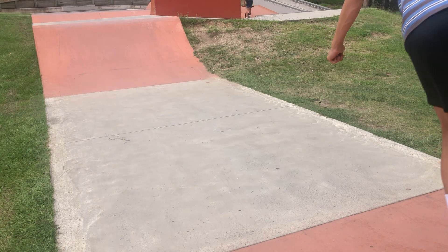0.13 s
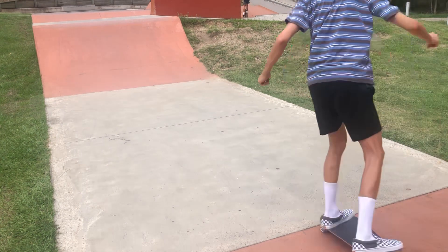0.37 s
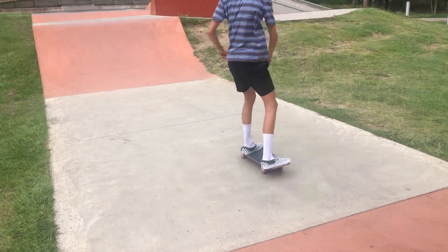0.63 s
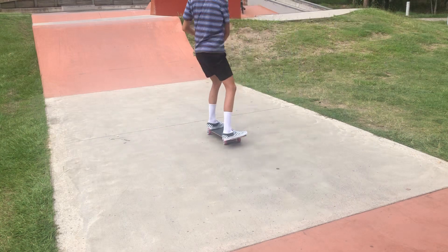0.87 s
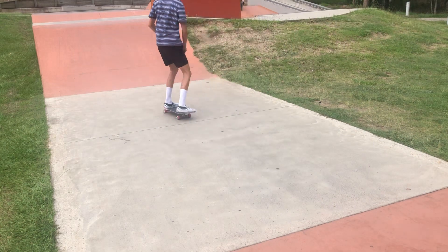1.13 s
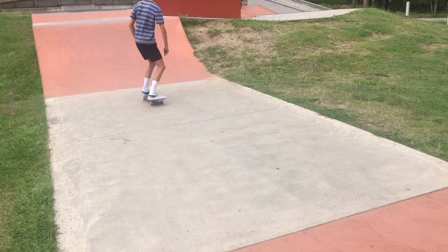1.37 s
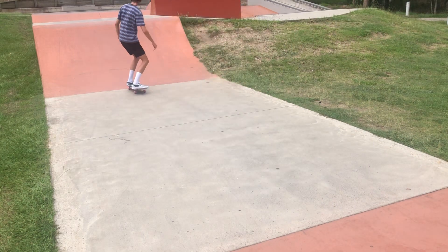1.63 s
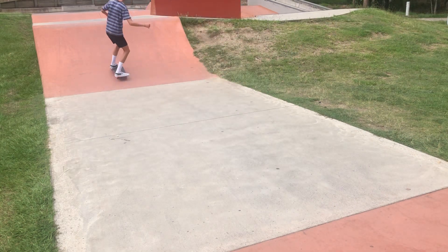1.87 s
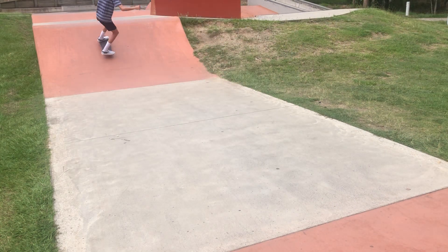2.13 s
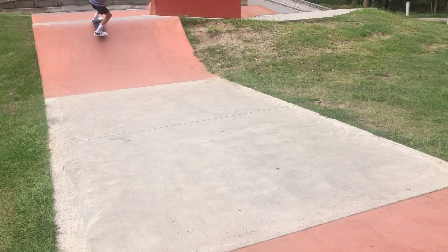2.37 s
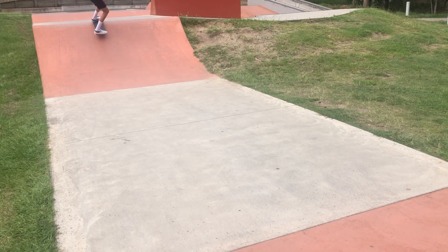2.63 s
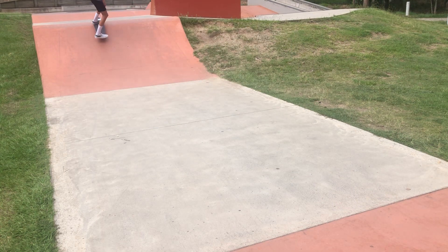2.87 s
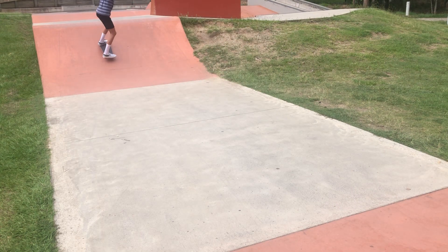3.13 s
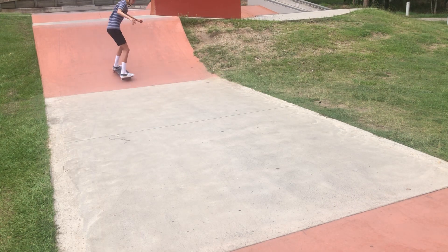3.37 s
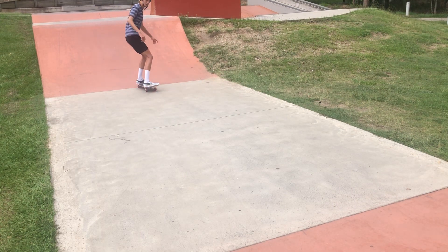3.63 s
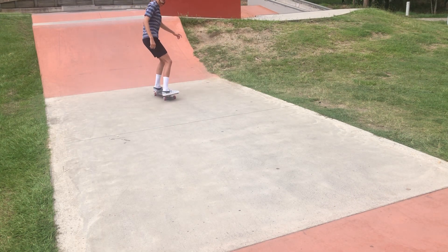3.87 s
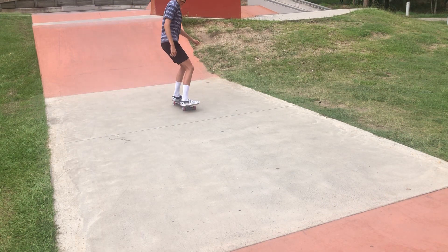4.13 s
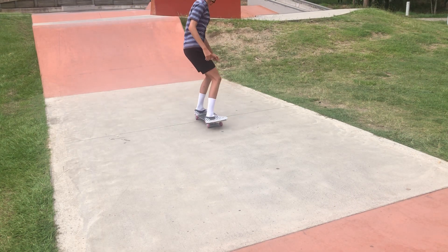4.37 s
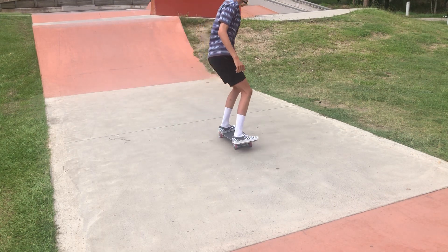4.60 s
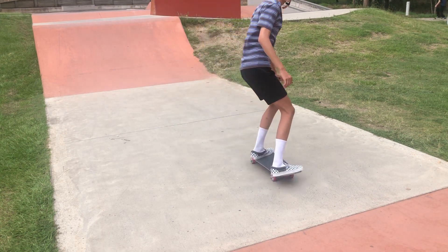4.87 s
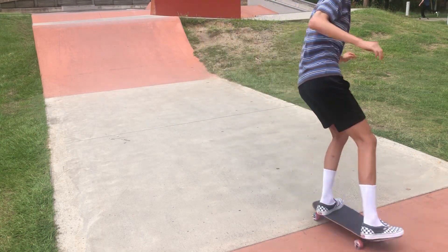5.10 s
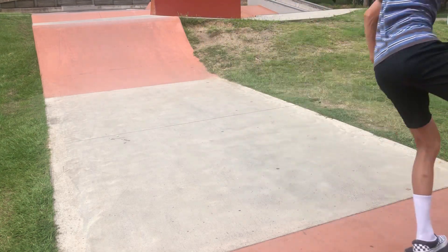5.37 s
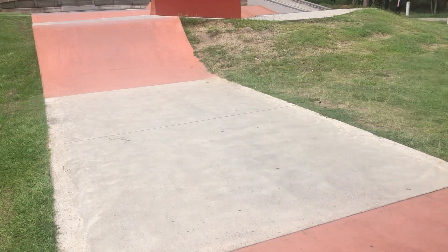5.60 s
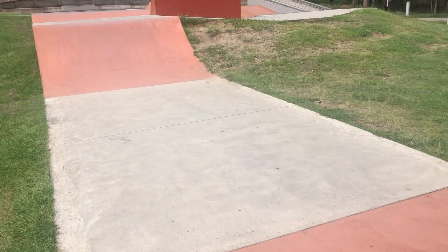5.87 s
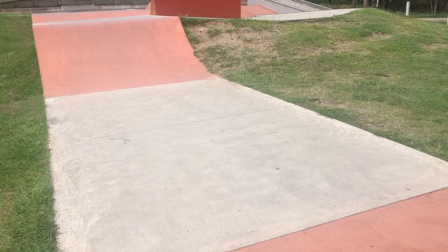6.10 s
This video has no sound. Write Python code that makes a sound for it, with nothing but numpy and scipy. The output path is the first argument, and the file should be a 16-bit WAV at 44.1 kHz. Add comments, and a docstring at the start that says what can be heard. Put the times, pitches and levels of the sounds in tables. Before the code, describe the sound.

Sharp board clack, gritty wheel roar fading into the distance, faint turn, roar swelling back, two hard clacks, then scraping shoe steps outdoors.

```python
"""A skateboard slams down beside a phone, rolls away over concrete, turns on a far ramp and rolls back; the rider steps off.
Random grains under the wheels excite resonances of the wooden deck and its axles, with hiss and fine grit on top.
Slab joints strike single blows, wheels judder and skid in the turn, a loose bearing ticks, and shoes scuff over grains.
Behind it lie filtered noise for traffic and cicadas, low wavering hums for two far engines and gliding whistles for a bird."""
import sys
import numpy as np
from scipy import signal
from scipy.fft import rfft, irfft, next_fast_len
from scipy.io import wavfile
from scipy.ndimage import uniform_filter1d

SR = 44100
rng = np.random.default_rng(int(sys.argv[2]) if len(sys.argv) > 2 else 0)


def decibels_to_gain(level_db):
    """Convert a level in decibels to a linear amplitude gain (20 dB per decade)."""
    exponent = np.asarray(level_db, float) / 20
    return 10 ** exponent


def bounce(signal):
    """Save signal as a 16-bit WAV file at the path given by the first command-line argument."""
    frames = np.transpose(np.atleast_2d(signal))
    limited = np.clip(frames, -1, 1)
    pcm = np.round(limited * 32767).astype(np.int16)
    wavfile.write(sys.argv[1], SR, pcm)


N = 275095
T = np.arange(N) / SR

# Resonances of the loaded deck: its slow flex, its roar, and the ring of the axles.
# Each row: centre in Hz, distance from the centre to the -6 dB points in Hz, gain in dB.
FLEX = [(146.5, 21, -9), (268, 102, -1), (350.6, 42.4, 4.5), (476.7, 106, 6.5)]
ROAR = [(584, 264, -3), (787, 169, 1.63), (982.5, 136, -3)]
AXLES = [(1127, 125, 5.5), (1426, 311, 2), (1773, 316, 1.5), (1904, 260, 0)]


def unit(x):
    """Scale to rms 1."""
    return x / np.sqrt(np.mean(x ** 2))


def colour(x, points):
    """Causal minimum-phase filter whose gain follows (Hz, dB) points, joined over log frequency."""
    hz, db = np.transpose(points)
    log_hz = np.log(np.maximum(np.fft.rfftfreq(4096, 1 / SR), 1))
    cepstrum = irfft(np.log(decibels_to_gain(np.interp(log_hz, np.log(hz), db))))
    # folding the cepstrum forward in time makes the filter causal
    cepstrum[1:2048] *= 2
    cepstrum[2049:] = 0
    impulse = irfft(np.exp(rfft(cepstrum)))
    return signal.oaconvolve(x, impulse)[:len(x)]


def ring(x, modes):
    """Sum of resonances with alternating sign, each applied twice."""
    out = 0
    for k, (hz, width, db) in enumerate(modes):
        b, a = signal.iirpeak(hz, hz / width / 2, SR)
        once = signal.lfilter(b, a, x)
        out = out + (-1) ** k * decibels_to_gain(db) * signal.lfilter(b, a, once)
    return out


def walk(rate):
    """Random levels held 1 / rate s and slewed twice."""
    k = int(SR / rate)
    held = np.repeat(rng.standard_normal(N // k + 1), k)
    return 1.02 * uniform_filter1d(uniform_filter1d(held, k), k)[:N]


def grit(count, per_s, scatter_db):
    """Grains of concrete: random clicks, a few much larger than the rest."""
    when = rng.random(count)
    sign = rng.standard_normal(count)
    size = rng.exponential(size=count)
    return (when < per_s / SR) * sign * decibels_to_gain(scatter_db * size)


def add(out, s, x):
    """Mix x into out from time s."""
    i = int(s * SR)
    out[i:i + len(x)] += x[:N - i]


def curves(table):
    """Columns of a table joined by straight lines in time."""
    s, *columns = np.transpose(table)
    return [np.interp(T, s, c) for c in columns]


def traffic():
    """Far road noise; bass and middle swell on their own."""
    # Spectrum of the far road. Each row: frequency in Hz, relative density in dB per Hz.
    road_tone = [(15, -30), (25, -14.5), (104, 5.5), (172, 2.5), (211, -1.5), (1480, -5), (1620, -6),
                 (1910, -23), (2040, -13), (2750, -22), (3620, -21), (6000, -32), (7800, -113),
                 (13200, -120)]
    hum = unit(colour(rng.standard_normal(N), road_tone))
    bass = signal.sosfilt(signal.butter(2, 130, fs=SR, output="sos"), hum)
    bass_swell, middle_swell = decibels_to_gain(2.5 * walk(2)), decibels_to_gain(1.5 * walk(5))
    return decibels_to_gain(-50) * (bass * bass_swell + (hum - bass) * middle_swell)


def engine(table):
    """A low hum is all that carries this far; pitch and level waver at random, silent outside its span."""
    s, hz, db = np.transpose(table)
    wavering_hz = np.interp(T, s, hz) * (1 + 0.0427 * walk(15))
    phase = 2 * np.pi * np.cumsum(wavering_hz) / SR
    heard = uniform_filter1d(1. * (T >= s[0]) * (T <= s[-1]), SR // 5)
    level = decibels_to_gain(np.interp(T, s, db) + 3.5 * walk(4) + 3.5 * walk(14))
    return np.sqrt(2) * heard * level * np.sin(phase)  # sqrt(2): table levels are rms


def cicadas():
    """A chorus merges into noise, loudest in one high band, with a fast throb that wavers in rate."""
    # Spectrum of the chorus. Each row: frequency in Hz, relative density in dB per Hz.
    buzz_tone = [(3240, -20), (5500, -26), (6070, -18), (7490, -0.5), (8300, -10.5), (8710, -20),
                 (10100, -37), (10400, -32), (11400, -39), (16000, -40)]
    throb_hz = 69.4 * (1 + 0.0072 * walk(3.6))
    throb = 1 + 0.14 * np.sin(2 * np.pi * np.cumsum(throb_hz) / SR)
    buzz = unit(colour(rng.standard_normal(N) * throb, buzz_tone))
    return decibels_to_gain(-53.5 + 0.96 * walk(0.38)) * buzz


def bird():
    """Short whistles: sine tones that glide in pitch under a rounded swell."""
    # Far bird notes. Each row: start in seconds, peak in dB, start pitch in Hz, end pitch in Hz, length in ms.
    notes = [(4.13, -55, 6080, 5950, 24), (4.168, -55, 6100, 6300, 34), (4.215, -58, 6250, 6350, 12),
             (4.265, -53, 6340, 6150, 47), (4.26, -56, 3830, 3680, 40), (6.183, -55, 2720, 2680, 18),
             (6.2, -51, 2630, 2480, 22)]
    out = np.zeros(N)
    for s, db, start_hz, end_hz, ms in notes:
        count = int(ms * SR / 1000)
        phase = 2 * np.pi * np.cumsum(np.linspace(start_hz, end_hz, count)) / SR
        add(out, s, decibels_to_gain(db) * np.hanning(count) ** .5 * np.sin(phase))
    return out


def struck(push, rasp, low_modes, axle_modes, roar_db, low_db, axle_db, crack_db):
    """One blow through the parts of the board, each at its own level over its loudest 4 ms."""
    # Spectrum of the bright crack. Each row: frequency in Hz, relative density in dB per Hz.
    crack_tone = [(600, -24), (1500, 3), (2500, 0), (4500, -5), (7000, -7.5), (11000, -13.5),
                  (16000, -21.5)]
    parts = ring(push, ROAR), ring(push, low_modes), ring(push, axle_modes), colour(rasp, crack_tone)
    out = 0
    for db, part in zip((roar_db, low_db, axle_db, crack_db), parts):
        loudest = np.sqrt(uniform_filter1d(part ** 2, SR // 250).max())
        out = out + decibels_to_gain(db) * part / loudest
    return out


def scuffs():
    """A sole lands with a thud and drags in jerks over loose grains until it grips."""
    # Shoes and tail on gritty concrete. Each row: start in seconds, deck level in dB, thud level in dB,
    # grit level in dB, drag length in ms (the grains are about 12 dB down by then).
    steps = [(5.392, -35, -25, -30.5, 4.1), (5.409, -26.5, -26.5, -42, 5.9), (5.423, -53, -36, -39.5, 20),
             (5.531, -39, -53, -44.5, 21), (5.58, -32.5, -38, -30, 11), (5.595, -22, -34, -25, 9.6),
             (5.617, -33, -42, -36.5, 37), (5.681, -25.5, -31.5, -28.5, 7.2),
             (5.722, -23.5, -28.5, -16.5, 2), (5.726, -24.5, -32, -27.5, 17), (5.848, -41, -46, -39.5, 3.7),
             (5.894, -11.5, -30, -15.5, 13.3), (5.906, -39, -20.5, -20, 21), (5.961, -22, -36, -22, 9.5),
             (5.971, -25, -27, -19, 8.8), (5.995, -26.5, -37, -22.5, 13), (6.012, -32, -36.5, -31.5, 17)]
    # A body's weight on the slab. Each row: centre in Hz, distance to the -6 dB points in Hz, gain in dB.
    thud_modes = [(107, 97, -22), (188, 35, 4.5), (292, 68, -3.5), (435, 110, 0.5)]
    # Axle that rings on once the rider's weight is off. The row: centre in Hz, distance to -6 dB in Hz, gain in dB.
    free_axle = [(2070, 14, 5)]
    axles_under_grit_db = -5
    out, t = np.zeros(N), T[:SR // 5]
    jerks = np.pad(decibels_to_gain(2.5 * walk(250)), (0, SR))
    for s, deck_db, thud_db, grit_db, ms in steps:
        grains = grit(len(t), 9000, 1.6) * jerks[int(s * SR):][:len(t)]
        drag = grains * np.exp(-(t / max(ms, .5) / 0.00059) ** 0.69)
        axle_db = grit_db + axles_under_grit_db
        add(out, s, struck(drag, drag, thud_modes, AXLES + free_axle, deck_db, thud_db, axle_db, grit_db))
    return out


def ticks():
    """A small steel part of a loose bearing rings for a few milliseconds."""
    # Bearing ticks. Each row: start in seconds, peak in dB, pitch in Hz.
    rattles = [(0.634, -36, 9200), (0.667, -40, 8960), (0.6918, -36, 9400), (0.8889, -38, 9000),
               (0.8989, -34, 9200), (1.0291, -39.5, 8800), (1.1318, -40.5, 8500), (3.5788, -33, 8670),
               (3.6094, -41, 8850)]
    out, t = np.zeros(N), T[:SR // 30]
    for s, db, hz in rattles:
        burst = rng.standard_normal(len(t)) * np.exp(-t / 0.0065)
        tick = ring(burst, [(hz, 500, 0)])
        add(out, s, decibels_to_gain(db) * tick / abs(tick).max())
    return out


def skids():
    """Wheels skid sideways: a short airy rasp that starts at once and trails off."""
    # Skids in the turn. Each row: start in seconds, starting level in dB, time to half amplitude in ms.
    slides = [(2.558, -52.5, 40), (3.165, -57.5, 75)]
    # Spectrum of the rasp. Each row: frequency in Hz, relative density in dB per Hz.
    rasp_tone = [(1500, -42), (2300, 8), (2800, 8), (4000, -4), (5300, 1), (6500, -29)]
    out, t = np.zeros(N), T[:SR // 6]
    for s, db, ms in slides:
        rasp = unit(colour(rng.standard_normal(len(t)), rasp_tone))
        add(out, s, decibels_to_gain(db) * rasp / (1 + (t / ms / 0.001) ** 3))
    return out


def pivot():
    """Wheels judder round atop the ramp: evenly paced stick and slip that grows to the turn and dies after it."""
    turn_s, builds_s, dies_s = 2.385, 0.052, 0.017
    first_s, gap_s, count, slip_s = 2.328, .0214, 6, .007
    out, t = np.zeros(N), T[:SR // 20]
    for s in first_s + gap_s * np.arange(count):
        press = np.exp(-abs(s - turn_s) / (builds_s if s < turn_s else dies_s))
        envelope = np.minimum(t / slip_s, 1) * np.exp(-(t / slip_s / 2) ** 2)
        slip = grit(len(t), 4000, 2.5) * envelope
        # the axles lead; roar, flex and crack sit under them
        add(out, s, press * decibels_to_gain(-26) * struck(slip, slip, FLEX, AXLES, -16, -30, 0, -28))
    return out


def clacks():
    """Each blow chatters for the length of the contact into the damped deck; its slowest flex stays still."""
    # Wheels and deck striking concrete. Each row: start in seconds, deck level in dB, axle level in dB,
    # crack level in dB, contact length in ms.
    blows = [(.061, -8, -43, -11, 7.9), (.127, -28.5, -32, -35.5, 19), (.168, -27, -32, -28.5, 4.1),
             (0.247, -28, -32, -28, 8.3), (.331, -29.5, -45, -44, 15), (.341, -22, -41, -32.5, 1.4),
             (0.403, -11, -10.5, -24.5, 8.4), (0.481, -19.5, -20.5, -24.5, 15.3),
             (0.603, -32, -42, -40, 8.6), (.897, -29, -26, -39.5, 2.4), (0.996, -32, -52, -42, 9.2),
             (1.065, -49, -55, -41, 6), (1.131, -29, -53, -47, 2.9), (1.696, -30, -25, -38, 6.6),
             (1.782, -27, -22, -37, 7.8), (1.86, -40, -43, -43.5, 9.8), (2.399, -34, -19, -53, 1.8),
             (2.684, -44, -23.5, -43.5, 5.4), (2.928, -55, -40, -56, 4.8), (3.206, -43, -34, -52, 18),
             (3.235, -35.5, -38, -45, 8.1), (3.58, -33, -35.5, -41, 13.3), (3.682, -40, -27.5, -42.5, 4.9),
             (4.325, -26.5, -32, -43, 5.6), (4.446, -35, -25.5, -39, 6.2), (5.069, -15.5, -20.5, -26, 8.7),
             (5.166, -12, -24.5, -27, 5.7), (5.386, -27, -59, -19.5, 1.74)]
    # flex against roar at the reference contact; a longer push bends the deck more
    flex_under_roar_db, reference_ms, db_per_doubling = -3.5, 6.2, 4.5
    out, t = np.zeros(N), T[:SR // 10]
    for s, deck_db, axle_db, crack_db, ms in blows:
        chatter = rng.standard_normal((2, len(t)))
        contact = np.minimum(t / .0012, 1) / (1 + (1000 * t / max(ms, 1)) ** 4)
        push = chatter[0] * contact
        rasp = chatter[1] * contact * np.exp(-t / 0.037)
        flex_db = deck_db + flex_under_roar_db + db_per_doubling * np.log2(max(ms, 3) / reference_ms)
        add(out, s, struck(push, rasp, FLEX[1:], AXLES, deck_db, flex_db, axle_db, crack_db))
    return out


def wheels():
    """One dense stream of grains drives deck and axles; patches of rougher concrete make it stutter."""
    # Rolling, before the board's mix gain. Each row: time in seconds, deck roar in dB, axle ring in dB.
    rolling = [(0.04, -48, -54), (0.12, -33.5, -39), (0.29, -27.5, -37.5), (0.45, -23.5, -30),
               (0.62, -26, -33.5), (0.78, -29.5, -37), (0.95, -31, -38), (1.2, -29.5, -45.5),
               (1.5, -33, -42.5), (1.84, -35.5, -48.5), (2.0, -34.5, -40), (2.26, -42.5, -44.5),
               (2.45, -52.5, -53.5), (2.7, -82, -65), (2.95, -49, -47), (3.33, -32.5, -38.5),
               (3.45, -39, -45.5), (4.12, -32.5, -42), (4.75, -32, -39), (5.12, -24, -31),
               (5.22, -28.5, -36.5), (5.33, -39, -46.5), (5.6, -47.5, -74), (6.24, -69, -74)]
    # Treble of the rolling, then of shoes scuffing after 5.3 s, before the same gain.
    # Each row: time in seconds, hiss in dB, fine grit in dB.
    treble = [(0.04, -53, -65), (0.12, -42.5, -54), (0.32, -37, -42), (0.66, -44, -48.5), (1.3, -58, -58.5),
              (2.0, -51.5, -59.5), (2.45, -73, -73), (3.0, -81, -69), (3.33, -54, -55), (3.8, -57.5, -57.5),
              (4.7, -53, -51.5), (5.12, -41.5, -45), (5.3, -47.5, -49.5), (5.45, -54, -60), (5.7, -47, -74),
              (6.05, -52.5, -71), (6.24, -64, -70)]
    # Spectra of hiss and fine grit. Each row: frequency in Hz, relative density in dB per Hz.
    hiss_tone = [(500, -23), (1500, 0), (2500, -1), (4000, -4.5), (6000, -6.5), (9000, -19), (12000, -74.5)]
    fine_tone = [(3000, -62), (6000, -16), (9000, -3.5), (11000, -7.5), (13500, -8), (16000, -14)]
    roar_db, axle_db = curves(rolling)
    hiss_db, fine_db = curves(treble)
    # the flex swells less than the roar: -37.5 dB at a roar of -35.5 dB, then 0.73 dB per dB
    flex_db = -37.5 + 0.73 * (roar_db + 35.5)
    # rolling back, the deck's flex faces the phone more
    flex_db = flex_db + 1.5 * (T > 3.4)

    patches = walk(25.13)
    road = grit(N, 6000, 1.6) * decibels_to_gain(.8 * patches + 1.3 * walk(70))
    roar = decibels_to_gain(roar_db) * unit(ring(road, ROAR))
    flex = decibels_to_gain(flex_db + 1.0 * walk(9.9)) * unit(ring(road, FLEX))
    axles = decibels_to_gain(axle_db + 0.2 * walk(24.3)) * unit(ring(road, AXLES))

    dust = grit(N, 14000, 0.68) * decibels_to_gain(0.3 * patches + 1.34 * walk(74))
    hiss = decibels_to_gain(hiss_db) * unit(colour(dust, hiss_tone))
    fine = decibels_to_gain(fine_db) * unit(colour(dust, fine_tone))
    # lone spat grains, 24 a second on average, 11 dB under the fine grit
    spits = decibels_to_gain(fine_db - 11) * unit(ring(grit(N, 24, 2), [(14000, 1500, 0)]))
    return roar + flex + axles + hiss + fine + spits


def both_ends(near):
    """Nose and tail sound in opposition: the far end adds an inverted, later, duller copy, so notches glide."""
    # The far end arrives later the more the board points at the phone. Each row: time in seconds, lag in ms.
    lags = [(0, 0.32), (.55, 0.41), (1.1, 0.98), (1.6, 1.174), (2.4, 1.75), (3.1, 1.74), (3.6, 1.24),
            (4.3, 1.055), (5.0, 0.44), (6.24, 0.13)]
    lag = np.interp(T, *np.transpose(lags)) / 1000
    low = signal.sosfiltfilt(signal.butter(2, 2600, fs=SR, output="sos"), near)
    dull = .2 * near + .8 * low
    # phase turned by 1.18 radians at every frequency
    turned = np.real(signal.hilbert(dull, next_fast_len(N))[:N] * np.exp(-1j * 1.18))
    return near - .62 * np.interp(T - lag, T, turned)


def scene():
    """Board, rider and surroundings; a blow falls on one axle, so only the rolling comes from both ends."""
    # Two far engines, the second one slowing.
    # Each row: time in seconds, pitch of a low hum in Hz, and its randomly wavering level in dB.
    passing = [(0.0, 57.7, -56), (1.5, 74, -57), (2.0, 68.4, -60), (3.0, 70.5, -56), (3.5, 79, -65),
               (4.08, 83.4, -52), (4.7, 73.1, -63.5), (5.45, 82, -53.5), (6.24, 76, -76)]
    slowing = [(3.4, 68.6, -44), (3.6, 61.6, -62), (4.95, 45.2, -67), (5.5, 46, -68)]
    surroundings = traffic() + engine(passing) + engine(slowing) + cicadas() + bird()
    board = both_ends(0.64 * wheels()) + clacks() + ticks() + skids() + pivot()
    return (surroundings + scuffs() + board)[None]


def band_limit(x):
    """A steep low-pass at the top of the band."""
    return signal.sosfilt(signal.butter(12, 17060, fs=SR, output="sos"), x)


def record(dry):
    """The phone rounds the loudest peaks."""
    rounded = np.tanh(.95 * dry) / .95
    return band_limit(rounded)


dry = scene()
out = record(dry)
bounce(out)
```